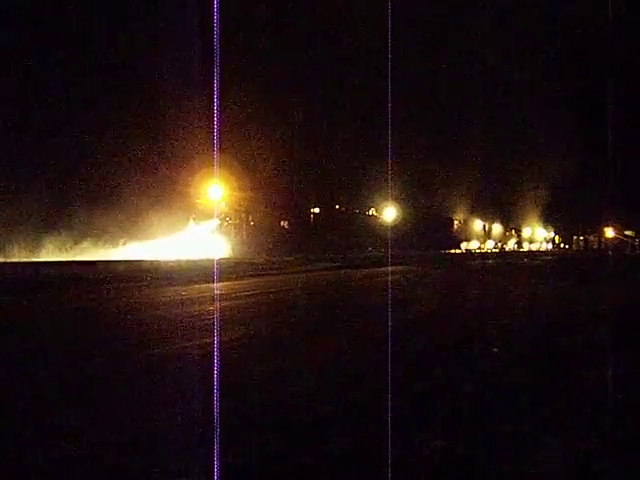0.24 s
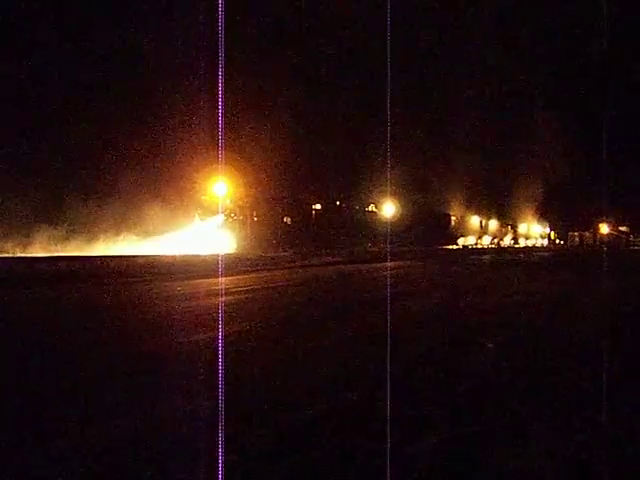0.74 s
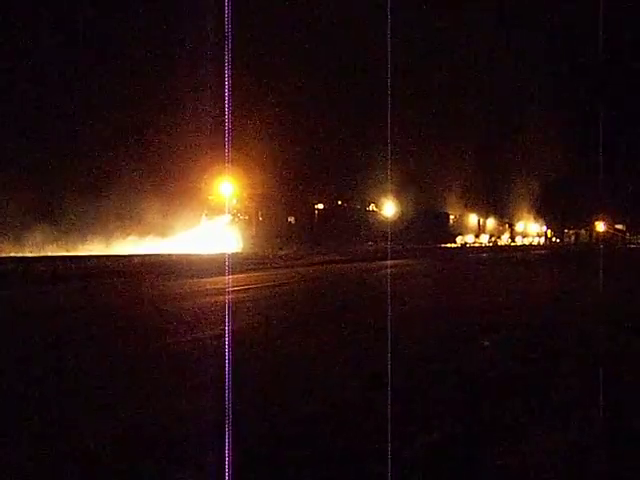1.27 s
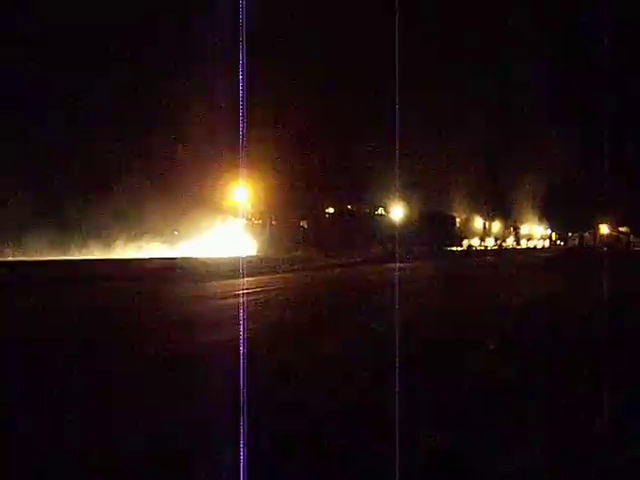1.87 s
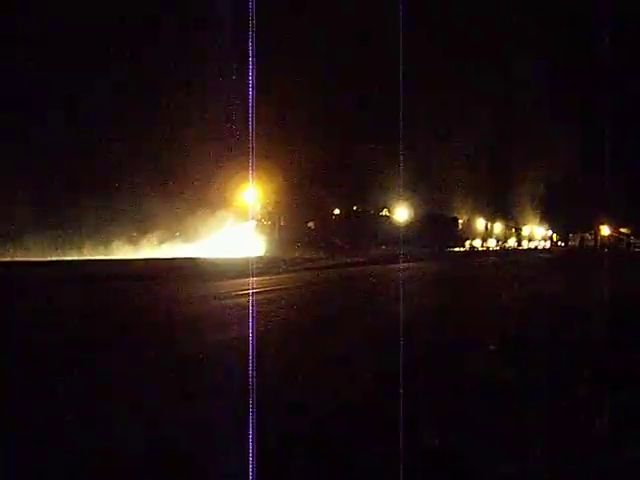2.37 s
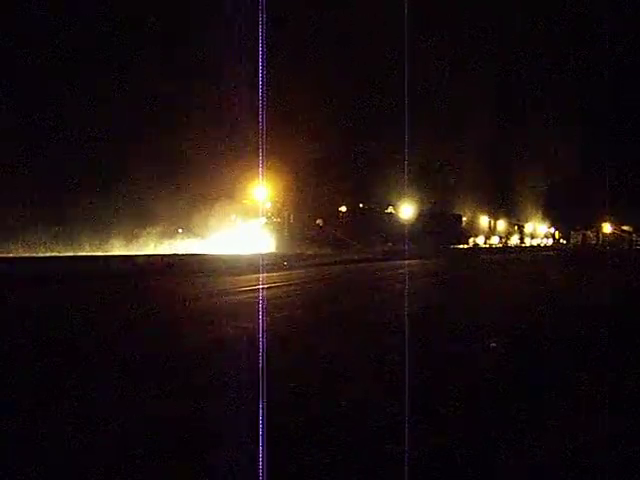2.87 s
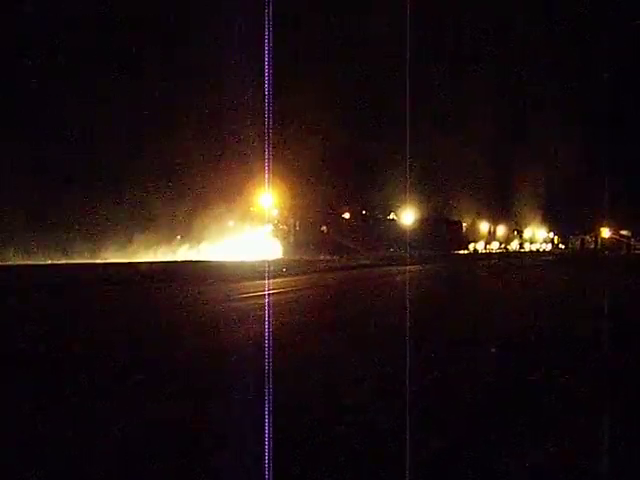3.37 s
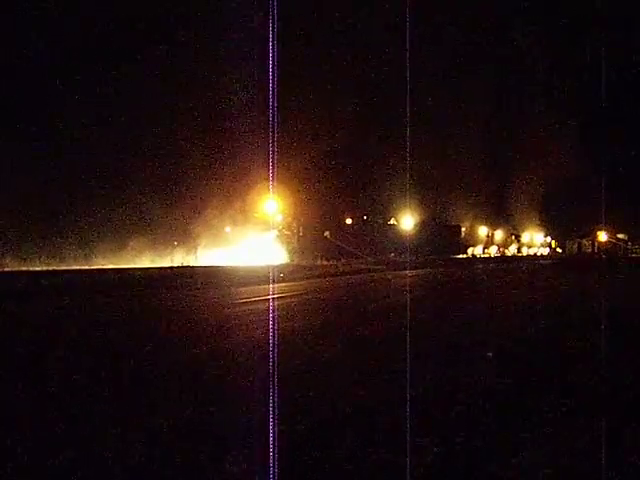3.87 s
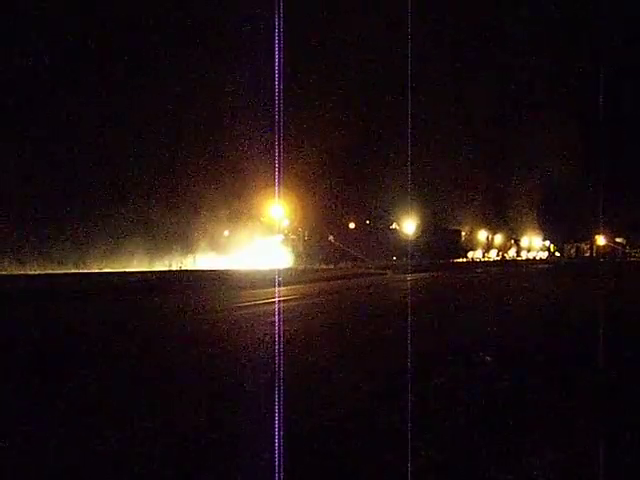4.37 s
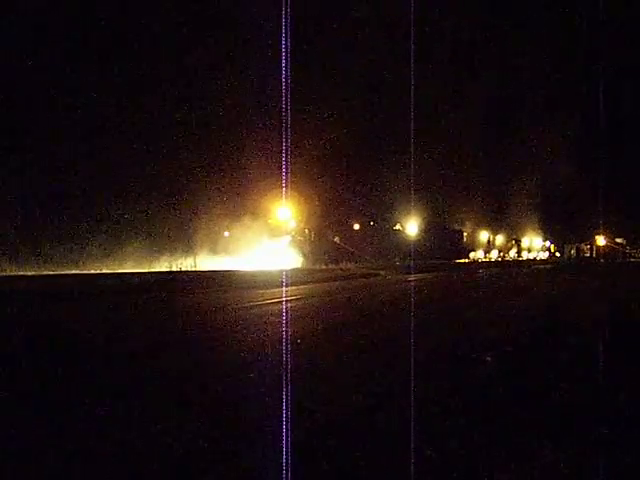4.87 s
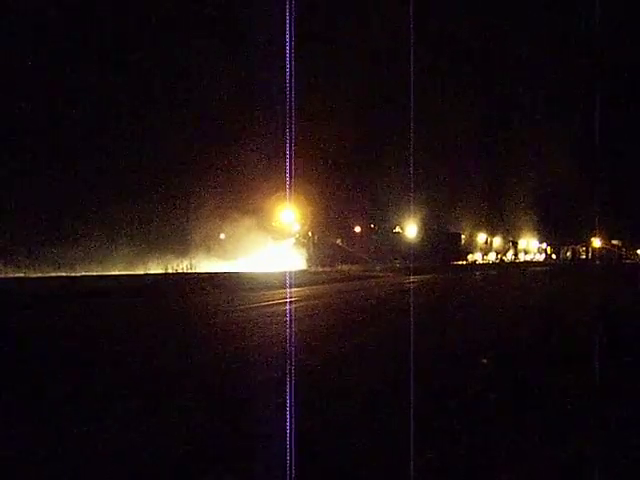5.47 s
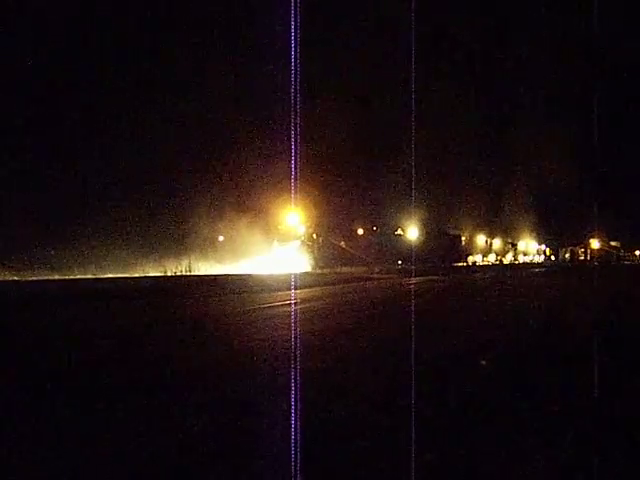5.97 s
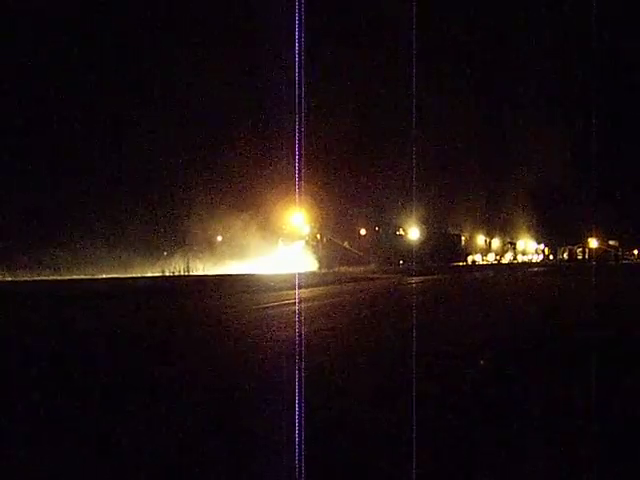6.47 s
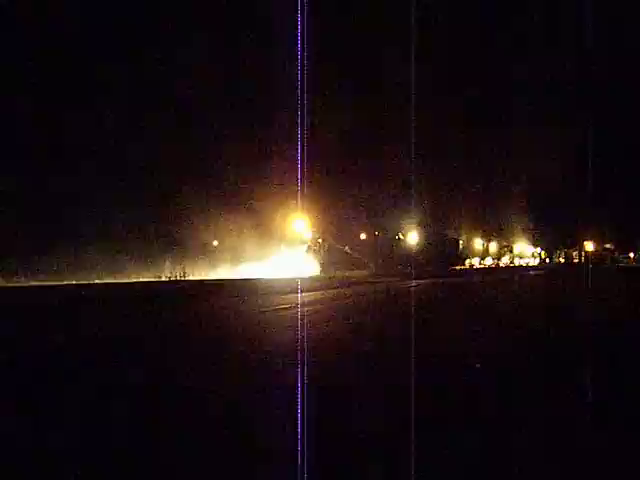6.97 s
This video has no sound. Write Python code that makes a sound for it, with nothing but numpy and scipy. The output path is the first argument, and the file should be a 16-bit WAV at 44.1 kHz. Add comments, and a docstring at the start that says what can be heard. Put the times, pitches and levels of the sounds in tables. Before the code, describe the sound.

A rail grinding train rasps and whines steadily along the track, with hissing sparks over a low diesel drone and rumble.

```python
"""Rail grinding train at night

The train creeps away along the track, heard from across a field. Its six-cylinder diesel drones at the firing
rate. A row of spinning stones rasps and whines on the rail and makes the housings roar; a high hiss sounds
above 4.2 kHz. The cars rumble and the blowers hum."""
import sys
import numpy as np
from scipy import signal
from scipy.fft import rfft, irfft
from scipy.io import wavfile

SR = 44100
rng = np.random.default_rng(int(sys.argv[2]) if len(sys.argv) > 2 else 0)


def to_wav(sig):
    """Store sig (one row per channel, or 1-D mono) as 16-bit WAV at the path in sys.argv[1].

    Samples outside -1..1 are clipped; the rate is SR.
    """
    pcm = np.clip(np.atleast_2d(sig), -1, 1) * 32767
    pcm = np.round(pcm).astype(np.int16)
    wavfile.write(sys.argv[1], SR, pcm.T)  # frames by channels


N = 319284

# Firing tone of the diesel: t/s, level/dB
FIRING_LEVEL = [(0, -23.5), (0.4, -23), (0.68, -27.5), (1.22, -22.5), (1.78, -28.8), (2.05, -26.5),
                (2.45, -28.7), (3.08, -25.0), (3.38, -34), (3.75, -27.5), (4.36, -34.5), (4.58, -26.9),
                (5.15, -30.5), (5.62, -28.5), (5.95, -35.5), (6.75, -32.5), (7.1, -30.5), (7.24, -30.7)]
# Weaker exhaust harmonics: multiple of the cycle rate, level/dB
EXHAUST_HARMONICS = [(2, -33.5), (3, -39.5), (4, -41.5), (5, -43.5), (7, -50), (8, -41.5), (9, -49.5),
                     (10, -54), (11, -55), (12, -44), (14, -51), (15, -56.5), (16, -60), (17, -50),
                     (18, -56.5), (19, -58), (20, -52), (23, -51)]
# Combustion knock and valve gear: f/Hz, relative level/dB per harmonic
CLATTER_SPECTRUM = [(330, -29.5), (410, -13.5), (450, -10), (480, -4.5), (520, -4.5), (620, 0.5), (720, 1),
                    (820, -5), (900, -5), (1100, -5.5), (1400, -6), (1800, -15), (2600, -26.5)]

def diesel(cycle_hz=14.93, waver_db=.6, waver_db_per_octave=.81):
    """Periodic firing: six pulses per four-stroke cycle drone; unequal cylinders add a throb."""
    cycles = shaft_turns(cycle_hz, wander=.000813, rate=1.64)
    def harmonic(order, db):
        """Shifting paths over the ground modulate the phase of each harmonic."""
        return from_db(db) * tone(round(order) * cycles + .09 * drift(.7))
    drone = harmonic(6, level_curve(FIRING_LEVEL))
    throb = np.zeros(N)
    for order, db in EXHAUST_HARMONICS:
        spread_db = waver_db + waver_db_per_octave * np.log2(order)   # flutter in the night air
        throb += harmonic(order, db + spread_db * drift(1.23))
    clatter = from_db(-41.5) * repeating(cycles, cycle_hz, CLATTER_SPECTRUM)
    return drone + receding(0, fall_db_per_s=.1) * throb + clatter


# Friction that repeats with each turn of a stone: f/Hz, relative level/dB per harmonic
WHINE_SPECTRUM = [(400, -18), (600, -1), (820, 0), (950, -5), (1250, -5), (1480, -1), (1700, 0.5),
                  (1840, 2.5), (2050, 0), (2250, -6.5), (2700, -5), (3600, -25.5)]

def stones(turn_hz=59.52, spread=.004, count=8):
    """Beating: each uneven face rubs periodically, at a speed set by its own load."""
    speeds = turn_hz * (1 + spread * np.linspace(-1, 1, count))
    whines = [repeating(shaft_turns(hz, wander=.002007, rate=1.998), hz, WHINE_SPECTRUM)
              for hz in speeds]
    return unit_rms(sum(whines))


# Housings round the stones: f/Hz, relative level/dB per Hz
HOUSING_SPECTRUM = [(330, -40.5), (450, -11.5), (500, -8), (545, -4), (590, -0.5), (670, -1), (780, -2),
                    (850, -6), (950, -13), (1300, -32)]
# Grit cutting steel: f/Hz, relative level/dB per Hz
RASP_SPECTRUM = [(400, -18), (800, -3), (1000, -0.5), (1350, -1), (1900, 0.5), (2450, 0), (2640, -3.5),
                 (2800, -4), (3050, -6.5), (3450, -8.5), (3800, -17), (4050, -27), (4250, -41), (5000, -69)]
# High hiss above 4.2 kHz: f/Hz, relative level/dB per Hz
HISS_SPECTRUM = [(3600, -43), (4220, -18), (4420, -6.5), (4650, -3), (5200, 0), (6600, 1), (7250, 2),
                 (7700, -2.5), (8000, -5.5), (8400, -13), (8750, -22.5), (9000, -36), (9300, -61.5)]
# Strength of the high hiss: t/s, relative level/dB
HISS_LEVEL = [(0, -47), (1.5, -46.5), (2.6, -47.9), (3.6, -48.0), (4.15, -49.5), (5.1, -48), (7.24, -49.5)]

def grinding(flutter_db=.25):
    """Abrasion: the stones' fluttering bite modulates roar, rasp, whine and the high hiss together."""
    roar = receding(-36.5, fall_db_per_s=.39) * coloured(grit(per_s=20000), HOUSING_SPECTRUM)
    rasp = receding(-34, fall_db_per_s=.2) * coloured(grit(per_s=38000), RASP_SPECTRUM)
    whine = receding(-38.5, fall_db_per_s=.2) * stones()
    hiss = from_db(level_curve(HISS_LEVEL) + .5) * coloured(grit(per_s=38000), HISS_SPECTRUM)
    return from_db(flutter_db * drift(7.8)) * (roar + rasp + whine + hiss)


def grit(per_s):
    """Shot noise: tiny fractures of random size occur at random moments."""
    return rng.standard_normal(N) * (rng.random(N) < per_s / SR)


# Rumble of the cars and exhaust: f/Hz, relative level/dB per Hz
RUMBLE_SPECTRUM = [(10, -11.5), (22, -10), (34, 0), (70, 3), (100, -2.5), (130, -5.5), (165, -6.5),
                   (205, -7.5), (245, -9), (285, -7), (340, -8), (400, -13.5), (450, -20.5), (900, -45)]

def rumble():
    """Random vibration: cars and exhaust radiate low noise that fades with distance."""
    return receding(-33, fall_db_per_s=.38) * coloured(rng.standard_normal(N), RUMBLE_SPECTRUM)


# Hum of the main blower: t/s, level/dB
BLOWER_LEVEL = [(0, -42.5), (1.1, -43), (1.6, -43.5), (2.5, -42), (4.0, -45.5), (5.2, -48), (6.2, -41),
                (6.9, -43), (7.24, -52)]
# Smaller fans and their motors: f/Hz, level/dB
FAN_TONES = [(57.3, -43.5), (137, -52), (143.5, -53.5), (272.9, -48.5), (388.6, -50.5), (410, -60.5),
             (687, -55.5), (767, -52.5), (776, -52), (1345, -57)]

def blowers(blade_hz=358.4, hum_waver_db=1.5, fan_waver_db=3.0, wander=.002006):
    """Blade passage: each fan gives a tone, which wavers on its way through the night air."""
    hum_gain = from_db(level_curve(BLOWER_LEVEL) + hum_waver_db * drift(4.6))
    hum = hum_gain * tone(shaft_turns(blade_hz, wander, rate=2.6))
    for hz, db in FAN_TONES:
        fan_gain = from_db(db + fan_waver_db * drift(2.7))
        hum += fan_gain * tone(shaft_turns(hz, wander, rate=3.75))
    return hum


def shaft_turns(hz, wander, rate):
    """Phase is the integral of speed, which here drifts by the fraction wander."""
    return rng.random() + np.cumsum(hz * (1 + wander * drift(rate))) / SR


def tone(turns):
    """Simple harmonic motion of rms 1 with a random starting phase."""
    return np.sqrt(2) * np.sin(2 * np.pi * (turns + rng.random()))


def repeating(turns, hz, spectrum, size=16384):
    """Fourier series: harmonics of random phase form a pattern that recurs every turn; rms 1."""
    harmonic_hz = np.arange(size // 2 + 1) * hz
    phasors = np.exp(2j * np.pi * rng.random(len(harmonic_hz)))
    pattern = irfft(gain_at(spectrum, harmonic_hz) * phasors)
    return unit_rms(np.interp(turns % 1 * size, np.arange(size), pattern))


def coloured(excitation, spectrum):
    """Source and filter: a spectral envelope shapes the excitation; rms 1."""
    response = gain_at(spectrum, np.fft.rfftfreq(N, 1 / SR))
    return unit_rms(irfft(rfft(excitation) * response, N))


def gain_at(spectrum, hz):
    """Spectral envelope, interpolated in log frequency and silent beyond its ends."""
    points_hz, db = np.transpose(spectrum)
    return from_db(np.interp(np.log(hz + 1e-9), np.log(points_hz), db, left=-200, right=-200))


def drift(rate, step=40, settle=2000):
    """Low-passed noise of rms 1 that changes about rate times a second."""
    pole = np.exp(-2 * np.pi * step * rate / SR)
    noise = rng.standard_normal(N // step + settle + 2)
    slow = signal.lfilter([1], [1, -2 * pole, pole * pole], noise)[settle:]
    return np.interp(np.arange(N) / step, np.arange(len(slow)), unit_rms(slow))


def receding(halfway_db, fall_db_per_s):
    """Spreading loss: the gain of a departing source falls, here linearly in decibels."""
    return from_db(halfway_db - fall_db_per_s * (np.arange(N) - N / 2) / SR)


def level_curve(rows):
    """Level in dB at every sample, by linear interpolation."""
    times, db = np.transpose(rows)
    return np.interp(np.arange(N) / SR, times, db)


def from_db(db):
    """Amplitude ratio of a level in decibels."""
    return 10 ** (np.asarray(db) / 20)


def unit_rms(x):
    """Normalisation to unit mean power."""
    return x / np.sqrt(np.mean(x ** 2) + 1e-20)


def scene():
    """Superposition: the sounds of the one departing train add in a single channel."""
    return (rumble() + diesel() + blowers() + grinding())[None]


def record(dry):
    """Band limiting: a steep elliptic low-pass removes the top treble."""
    cutoff_hz = 9033
    return signal.sosfilt(signal.ellip(10, .1, 80, cutoff_hz, fs=SR, output="sos"), dry)


dry = scene()
out = record(dry)
to_wav(out)
```